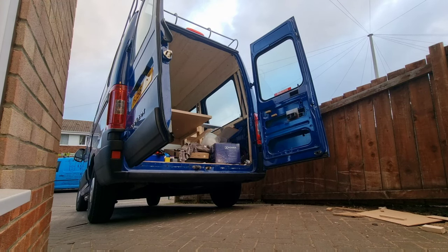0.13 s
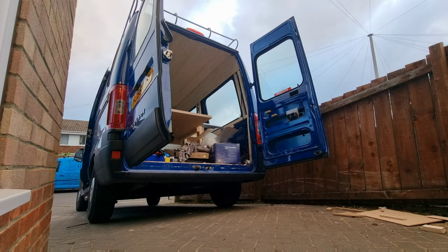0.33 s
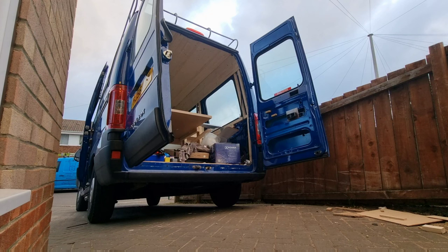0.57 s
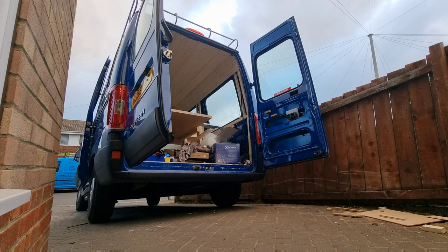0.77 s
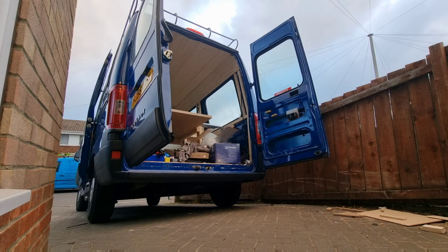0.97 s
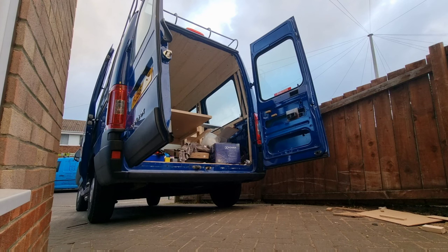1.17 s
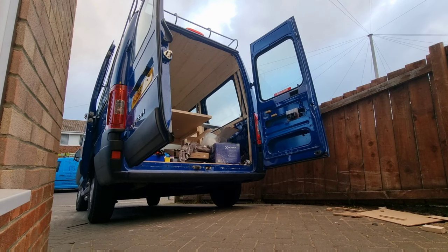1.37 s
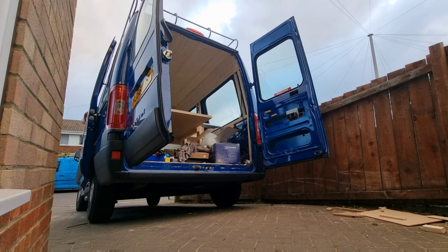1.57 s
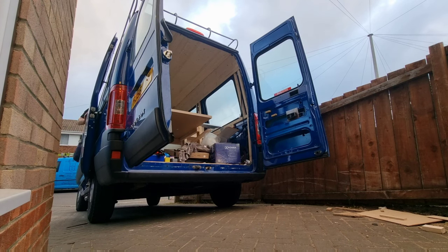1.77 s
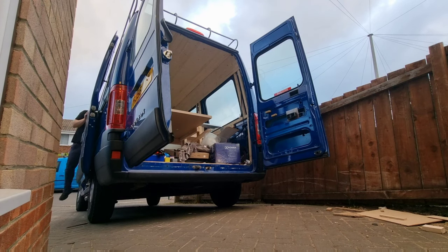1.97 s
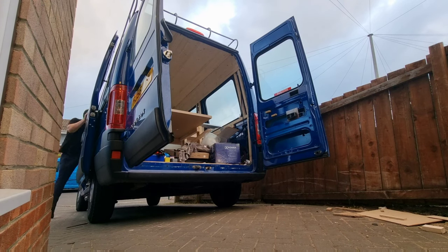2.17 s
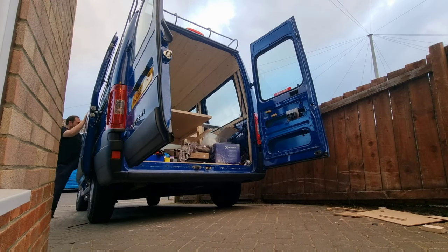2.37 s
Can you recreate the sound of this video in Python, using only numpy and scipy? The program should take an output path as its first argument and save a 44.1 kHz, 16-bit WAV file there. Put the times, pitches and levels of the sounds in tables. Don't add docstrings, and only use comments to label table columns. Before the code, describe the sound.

Heavy metal van door sliding open outdoors, with a latch clunk, hollow rolling and a sharp clack

```python
import sys
import numpy as np
from scipy import signal
from scipy.fft import rfft, irfft
from scipy.io import wavfile
from scipy.ndimage import uniform_filter1d, map_coordinates

SR = 44100
rng = np.random.default_rng(int(sys.argv[2]) if len(sys.argv) > 2 else 0)


def unload_audio(sound):
    columns = np.transpose(np.atleast_2d(sound))
    steps = np.round(np.clip(columns, -1, 1) * 32767)
    wavfile.write(sys.argv[1], SR, steps.astype(np.int16))


def boost(x):
    u = np.asarray(x, float) / 20
    return 10 ** u


N = 110250
T = np.arange(N) / SR

# pitch [Hz], width [Hz], level [dB].
STEEL = [(2610, 70, 0), (2730, 70, -5), (3260, 120, -9), (3800, 120, -6), (4550, 150, -8), (5190, 150, -10),
         (6600, 400, -11)]


def unit(x):
    return x / np.sqrt(np.mean(x ** 2) + 1e-30)


def level_db(rows, column=1):
    rows = np.array(rows)
    return np.interp(T, rows[:, 0], rows[:, column], left=-120, right=-120)


def pitch_hz(rows):
    rows = np.array(rows)
    return np.interp(T, rows[:, 0], rows[:, 1])


def turn(hz):
    return 2 * np.pi * np.cumsum(hz) / SR


def equalise(x, points):
    hz, db = np.array(points).T
    n = x.shape[-1]
    f = np.arange(n // 2 + 1) * SR / n + 1
    return irfft(rfft(x) * boost(np.interp(np.log(f), np.log(hz), db)), n)


def colour(x, points):
    return unit(equalise(x, points))


def high_pass(x, hz, order=2):
    return signal.sosfilt(signal.butter(order, hz, "high", fs=SR, output="sos"), x)


def ring(x, hz, t60_s):
    pole = np.exp(2j * np.pi * hz / SR - np.log(1000) / (max(t60_s, 1e-3) * SR))
    return signal.lfilter([1], [1, -pole], x).imag


def ring_steel(x, damping):
    return sum(boost(db) * ring(x, hz, damping / width) * np.sqrt(width) for hz, width, db in STEEL)


def ring_modes(x, modes):
    out = np.zeros(N)
    for k, (hz, db, t60_s) in enumerate(modes):
        out += (-1) ** k * boost(db) * ring(x, hz, t60_s) / np.sqrt(t60_s)
    return out


def grains(per_s, scatter_db):
    chance, sign, size = rng.random((3, N))
    clicks = (chance < per_s / SR) * np.sign(sign - .5)
    return unit(clicks * boost(-scatter_db * np.log(size + .04)))


def walk(rate_hz):
    k = int(SR / rate_hz)
    return unit(uniform_filter1d(uniform_filter1d(rng.standard_normal(N), k), k))


def air():
    # frequency [Hz], level [dB per Hz].
    air_spectrum = [(15, -22), (25, -4), (122, 1.5), (233, -20), (289, -22), (1020, -28.5), (1340, -31.5),
                    (1620, -31.5), (15500, -66.5)]
    mid, side = (colour(rng.standard_normal(N), air_spectrum) * boost(1.5 * walk(6)) for _ in range(2))
    side = high_pass(side, 300)
    return boost(-54) * (mid + 1.2 * side * np.array([[1], [-1]]))


def squeaks():
    # time [s], pitch [Hz], level [dB].
    squeak = [(0.97, 801, -61), (0.992, 843, -27), (1.002, 820, -37), (1.01, 799.6, -39),
              (1.032, 865.7, -28.5), (1.044, 886.5, -18.5), (1.06, 870, -35), (1.072, 840, -28),
              (1.1, 770, -50.5)]
    overtone_db = [0, -9, -29, -33]
    # time [s], centre [Hz], level [dB].
    squeal = [
        (0.27, 6800, -79),
        (0.286, 6920, -61),
        (0.302, 6760, -57),
        (0.37, 6550, -82),
    ]
    phase = turn(pitch_hz(squeak) * (1 + .02 * walk(170)))
    tone = sum(boost(db) * np.sin((k + 1) * phase) for k, db in enumerate(overtone_db))
    low = 1.4 * tone * boost(level_db(squeak, column=2) + 2.5 * walk(130))
    phase = turn(pitch_hz(squeal) * (1 + 0.027 * walk(900)))
    tone = np.sin(phase) + boost(-9.5) * np.sin(2 * phase)
    return low + 2.8 * tone * boost(level_db(squeal, column=2) + 4.9 * walk(280))


def drone():
    # time [s], pitch [Hz], level [dB].
    ripple = [(1.5, 181.3, -44), (1.534, 185.3, -53), (1.584, 193.2, -41), (1.762, 182.1, -44.5),
              (1.782, 182, -38), (1.9, 169.3, -51), (2.04, 168.6, -55), (2.08, 167.5, -66)]
    hz = pitch_hz(ripple) * (1 + 0.0498 * walk(40))
    return np.sin(turn(hz)) * boost(level_db(ripple, column=2) + 3.0 + 5.3 * walk(59))


def knocks():
    # start [s], level [dB], pitch [Hz], t60 [s].
    blows = [
        (0.217, -9, 197.4, 0.094),
        (0.248, -16.5, 68.1, 0.35),
        (0.333, -21.5, 62.7, 0.52),
        (0.248, -28.5, 211.6, 0.33),
        (1.108, -22, 77, 0.18),
        (1.1386, -16.5, 328, 0.03),
    ]
    out = np.zeros(N)
    for start_s, db, hz, t60_s in blows:
        push = np.sin(np.pi * np.clip((T - start_s) * hz * 2, 0, 1))
        out += boost(db) * ring(push / push.sum(), hz, t60_s) * 0.88
    return out


def thuds():
    # start [s], level [dB], pitch [Hz], t60 [s].
    boom = [(0.493, -30.5, 222.5, 0.15), (0.589, -32, 204.5, 0.12), (0.64, -28, 195.5, 0.12),
            (0.673, -25.5, 260, 0.23), (0.766, -23, 199.3, 0.11), (0.824, -30, 248, 0.2),
            (0.864, -30.5, 223.3, 0.15), (0.913, -27, 217.4, 0.16), (0.983, -29.5, 213.3, 0.22),
            (1.05, -28.5, 213, 0.14), (1.134, -26.5, 187, 0.15), (1.168, -26.5, 241.5, 0.11),
            (1.208, -27.5, 257.5, 0.17), (1.24, -24.5, 211.4, 0.1), (1.285, -25.5, 252.2, 0.19),
            (1.392, -25.5, 215, 0.18), (1.436, -30, 236.5, 0.1), (1.478, -29, 182, 0.13),
            (1.513, -31, 263, 0.16), (1.57, -29.5, 216.6, 0.12), (1.652, -24.5, 258, 0.15),
            (1.693, -31, 184.7, 0.19), (1.75, -33, 189.5, 0.13), (1.804, -31, 195.7, 0.13),
            (1.969, -42.5, 207, 0.13), (2.021, -45.5, 178.2, 0.21)]
    frame = [(0.529, -36, 363, 0.13), (0.631, -33.5, 362, 0.18), (0.761, -28.5, 446, 0.11),
             (0.89, -29.5, 340, 0.15), (1.029, -27, 342, 0.17), (1.336, -31, 401.5, 0.15),
             (1.375, -31.5, 409, 0.13), (1.449, -30, 404, 0.16), (1.576, -32, 368, 0.14),
             (1.639, -31, 381, 0.14), (1.824, -40, 320, 0.14)]
    ping = [(1.1203, -28.5, 3870, 0.05), (1.1272, -30, 3830, 0.036), (1.2815, -32.5, 1910, 0.047),
            (1.284, -36.5, 4700, 0.032), (1.284, -42, 6880, 0.027), (1.292, -36, 2400, 0.035),
            (1.385, -31.5, 2085, 0.038), (1.391, -38, 2610, .04), (1.401, -36, 2310, 0.04),
            (1.562, -40, 4780, 0.029), (1.637, -29, 1924, 0.047), (1.646, -34.5, 2156, 0.037),
            (2.2915, -54, 620, 0.067), (2.307, -52.5, 497, 0.086), (2.395, -48, 1013, 0.041),
            (2.412, -55, 900, 0.045), (2.425, -49.5, 1010, 0.088), (2.425, -62, 3800, .05),
            (1.86, -40, 249, .14), (1.93, -44, 256, 0.17)]
    push_turns = 0.8
    out = np.zeros(N)
    for start_s, db, hz, t60_s in [*boom, *frame, *ping]:
        turns = np.clip((T - start_s) * hz, 0, push_turns)
        push = np.sin(np.pi * turns / push_turns) * np.cos(2 * np.pi * turns)
        out += boost(db - 2) * ring(2 * push / np.abs(push).sum(), hz, np.clip(t60_s, .02, .3))
    return out


def strikes():
    # start [s], level [dB].
    hits = [(1.1183, -5), (1.124, -14.5), (1.1252, -3), (1.128, -6.5), (1.1325, -5.5), (1.14, -0.5),
            (1.141, -2), (1.142, -3), (1.1475, -8), (1.154, -10), (1.16, -8.5), (1.169, -10)]
    t60_s, snap_db = .025, -2.5
    force = np.zeros(N)
    for start_s, db in hits:
        force += boost(db - 60 * np.clip(T - start_s, 0, 1) / t60_s) * (T >= start_s)
    grit = rng.standard_normal(N)
    steel = ring_steel(grit * force, 1.3) / np.std(ring_steel(grit, 1.3))
    band = signal.butter(1, [1200, 9000], "band", fs=SR, output="sos")
    snap = signal.sosfilt(band, grit * force)
    return boost(-26) * (steel + boost(snap_db) * snap)


def blow_shape(t, hold_s, t60_s):
    rise_s = .007
    return np.clip((t + rise_s / 2 if t60_s < 0.1 else t) / rise_s, 0, 1) * boost(
        -60 * np.clip((t + rise_s / 2 if t60_s < 0.1 else t) - hold_s, 0, 9) / t60_s)


def blow_shape(t, hold_s, t60_s, rise_s=.007):
    return np.clip(t / rise_s, 0, 1) * boost(-60 * np.clip(t - hold_s, 0, 9) / t60_s)


def clacks():
    # start [s], peak [dB], ring [Hz], chatter length [s], brightness [dB].
    joints = [(0.116, -66, 2260, 0.017, 11), (0.136, -55.5, 3250, 0.066, 3.5),
              (0.217, -36, 1200, 0.042, -12), (0.353, -38, 1300, 0.012, -4.5),
              (0.4434, -43.5, 2980, 0.057, -4), (0.7184, -26, 1990, 0.0067, 3.5),
              (0.966, -35, 1145, 0.012, -2.5), (0.9885, -35, 1970, 0.01, -4),
              (1.033, -32.5, 1760, 0.017, -5.5), (1.112, -38, 2170, 0.012, -0.5),
              (1.121, -24.5, 2430, 0.028, 6), (1.2805, -29, 1965, 0.014, 0),
              (1.3805, -31, 2220, 0.019, -18), (1.427, -37, 1230, 0.0063, 2),
              (1.5577, -34.5, 1850, 0.014, 0.5), (1.6362, -28, 1930, 0.016, 1),
              (1.692, -53.5, 1855, 0.016, -2.5), (2.288, -57, 2200, 0.0093, -4),
              (2.304, -57, 1090, 0.018, -11.5), (2.392, -59.5, 1310, 0.017, -3),
              (2.427, -56, 990, 0.0099, 1.5), (1.193, -36, 1960, 0.02, -12.5)]
    # frequency [Hz], level [dB per Hz].
    crash_spectrum = [(240, -17), (400, 2.5), (569, -15), (623, -4), (834, -4.5), (1490, -9), (2320, -15.5),
                      (7100, -26), (15500, -44)]
    crash_db, ring_db, crash_t60_s = -4.5, -11, 0.063
    ticks = grains(per_s=2500, scatter_db=3)
    crash = colour(rng.standard_normal(N) + 0.37 * ticks, crash_spectrum)
    fizz = high_pass(crash, 3500)
    out, ringing = np.zeros(N), np.zeros(N)
    for start_s, db, hz, chatter_s, bright_db in joints:
        blow = blow_shape(T - start_s + .0035, chatter_s, crash_t60_s)
        out += boost(db + crash_db) * blow * (crash + (boost(bright_db) - 1) * fizz)
        own = unit(ring(ticks, hz, .013) - .6 * ring(ticks, hz * 1.2, .012))
        ringing += boost(db + ring_db + (db + 25) / 4) * blow ** 2 * own
    bracket = boost(-37) * blow_shape(T - 1.1195, hold_s=0.018, t60_s=0.12)
    bracket_fizz = unit(high_pass(uniform_filter1d(ticks, size=2), 10000))
    out += boost(-5) * bracket * bracket_fizz
    return out, ringing + bracket * unit(ring_steel(ticks, 2))


def rolling():
    # time [s], rumble [dB], runner hiss [dB].
    force = [(0.08, -55.5, -93), (0.2, -40.5, -58.5), (0.22, -19, -62.5), (0.31, -37.5, -41.5),
             (0.34, -27, -64.5), (0.38, -40.5, -55.5), (0.72, -25.5, -48.5), (1.03, -27, -52.5),
             (1.15, -21.5, -35), (1.22, -33, -56.5), (1.32, -26.5, -53), (1.56, -35.5, -63),
             (1.6, -36.5, -113), (1.63, -47, -84), (1.65, -31.5, -60.5), (1.88, -44, -67),
             (2.15, -61.5, -88.5), (2.26, -67.5, -69.5), (2.36, -51.5, -75), (2.5, -45.5, -78)]
    # time [s], level [dB].
    sway = [(0.2, -37), (0.21, -39.5), (0.27, -29.5), (0.31, -46.5), (0.35, -32), (0.57, -37.5),
            (0.75, -25), (0.88, -40.5), (1.24, -28.5), (1.28, -46.5), (1.39, -43.5), (1.43, -32),
            (2.44, -66.5), (2.5, -41)]
    # pitch [Hz], level [dB], t60 [s].
    panel_modes = [(160, -4, .08), (187, -2, .08), (217, 0, .1), (255, -2, .08), (280, -7, .06),
                   (345, -6, .06), (372, -9, .05), (410, -10, .045), (460, -12, .04), (510, -9, .045),
                   (580, -10, .04), (670, -12, .035), (780, -12, .035), (880, -14, .03)]
    skin_modes = [(51.8, -2, 0.13), (69.2, -1.5, 0.25), (89.3, -5.5, 0.11), (125.6, -10.5, 0.15)]
    # frequency [Hz], level [dB per Hz].
    runner = [(290, -47), (500, -1), (638, -9.5), (815, -16), (914, -13), (1120, -7), (1560, -14.5),
              (6550, -35), (15500, -54.5)]
    bumps_per_s, scatter_db = 500, 2.5
    bumps = grains(bumps_per_s, scatter_db)
    panel = ring_modes(bumps * boost(level_db(force) - 5), panel_modes)
    panel /= np.std(ring_modes(bumps, panel_modes))
    skin = ring_modes(grains(bumps_per_s, scatter_db) * boost(level_db(sway)), skin_modes)
    skin /= np.std(ring_modes(bumps, skin_modes))
    grit = colour(grains(per_s=2500, scatter_db=6) + rng.standard_normal(N), runner)
    return panel + skin, grit * boost(level_db(force, column=2) + 3 + 0.5 * walk(40))


def echo(source):
    places, t60_s, rise_s = 16, 0.21, 0.00086
    bright = high_pass(source, 270)
    t = T[:SR // 2]
    out = np.zeros((2, N))
    for place in range(places):
        tails = rng.standard_normal((2, len(t))) * boost(-60 * t / t60_s) * np.clip(t / rise_s, 0, 1)
        tails /= np.sqrt((tails ** 2).sum(axis=1, keepdims=True))
        here = np.cos(np.pi / 2 * np.clip(T / T[-1] * (places - 1) - place, -1, 1))
        out += signal.fftconvolve((bright * here)[None], tails, axes=1)[:, :N]
    return boost(1.5) * out


def scene():
    right_lag_s, left_db = 0.000327, -2.5
    body, grit = rolling()
    crash, ringing = clacks()
    tones = ringing + squeaks() + thuds() + strikes()
    door = body + grit + drone() + knocks() + crash + tones
    late = map_coordinates(door, [(T - right_lag_s) * SR], mode="nearest")
    direct = np.array([door * boost(left_db / 2), late * boost(-left_db / 2)])
    return direct + echo(door - 0.55 * tones) + air()


def band_limit(x):
    return signal.sosfilt(signal.butter(12, 15690, fs=SR, output="sos"), x)


def record(dry):
    # frequency [Hz], gain [dB].
    tone_curve = [(20, -16), (45, -1), (7400, 0.5), (8200, -9.5), (11000, -4.5), (15500, -2)]
    hiss = high_pass(rng.standard_normal(dry.shape), 10500, order=3)
    wet = equalise(dry, tone_curve) + boost(-84) * hiss
    top_cut = signal.ellip(8, .2, 70, 15650, fs=SR, output="sos")
    return band_limit(signal.sosfilt(top_cut, wet))


dry = scene()
out = record(dry)
unload_audio(out)
```